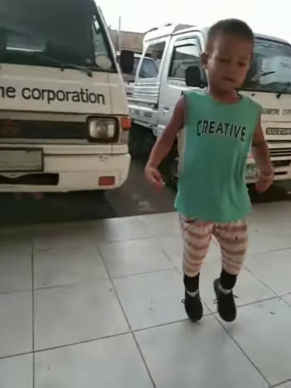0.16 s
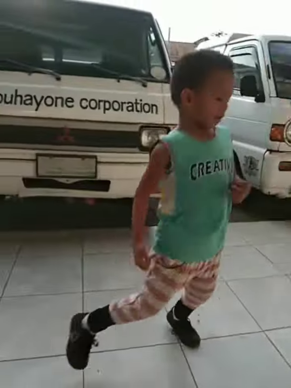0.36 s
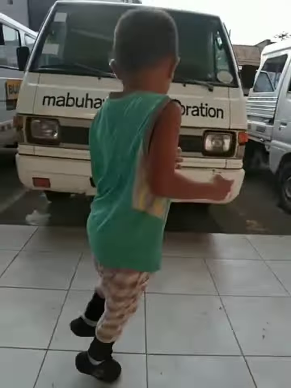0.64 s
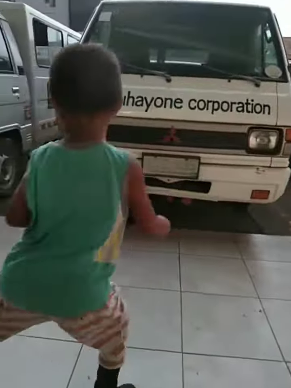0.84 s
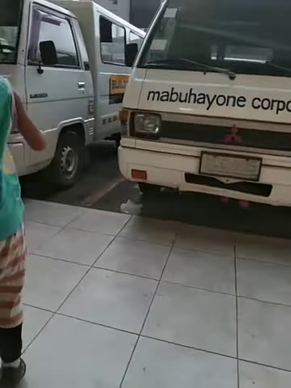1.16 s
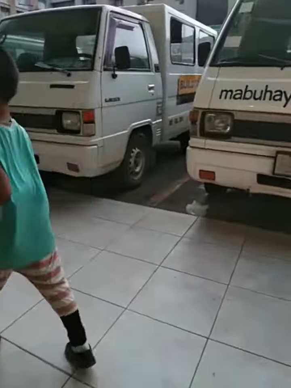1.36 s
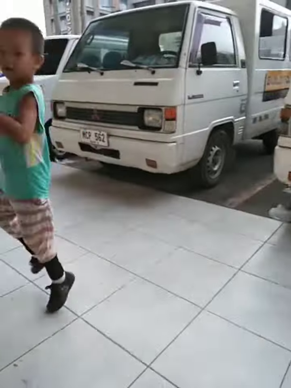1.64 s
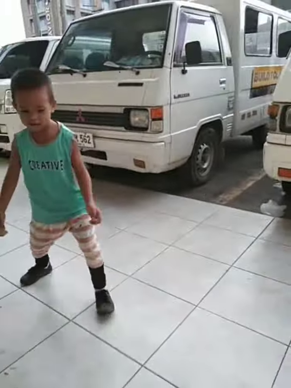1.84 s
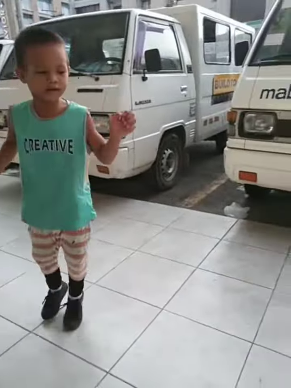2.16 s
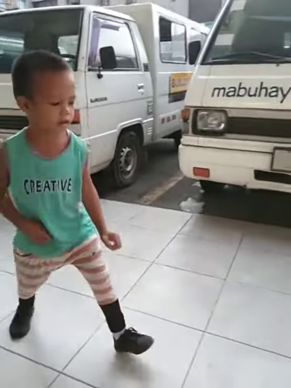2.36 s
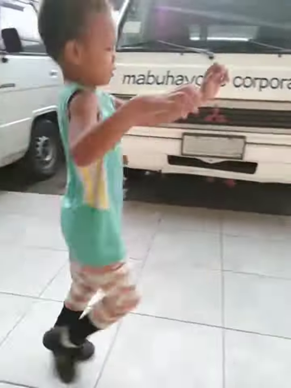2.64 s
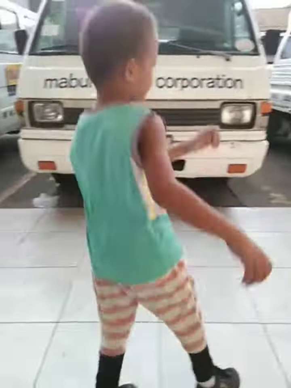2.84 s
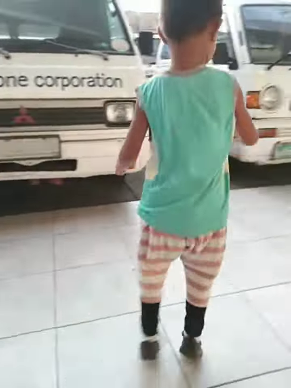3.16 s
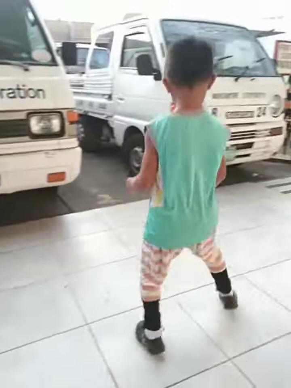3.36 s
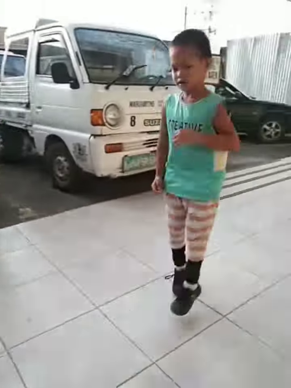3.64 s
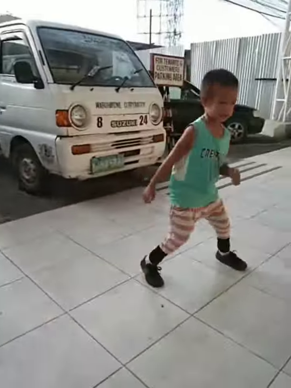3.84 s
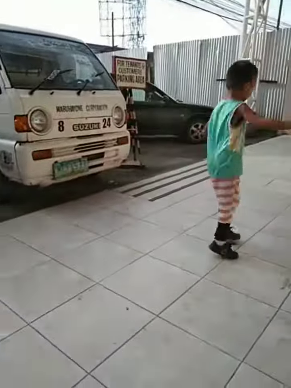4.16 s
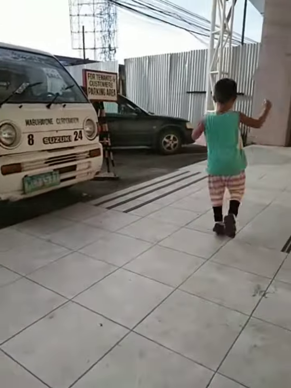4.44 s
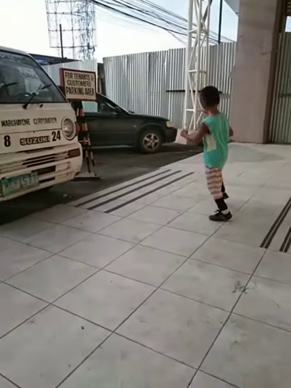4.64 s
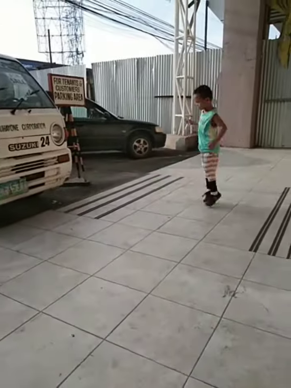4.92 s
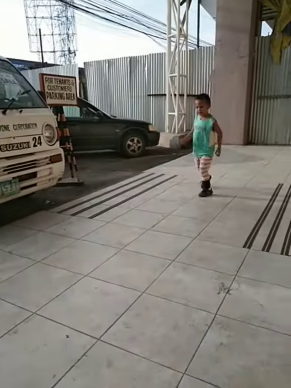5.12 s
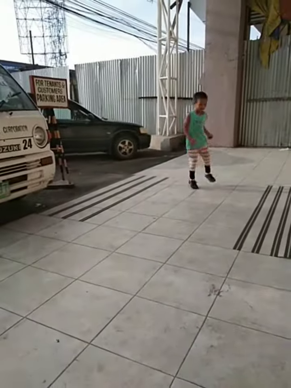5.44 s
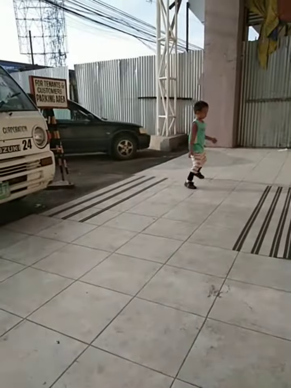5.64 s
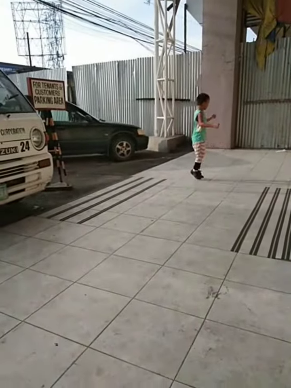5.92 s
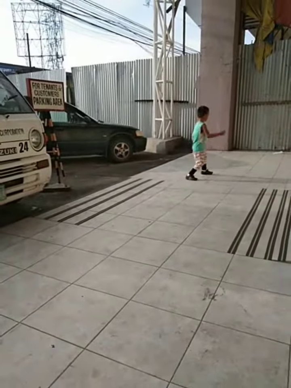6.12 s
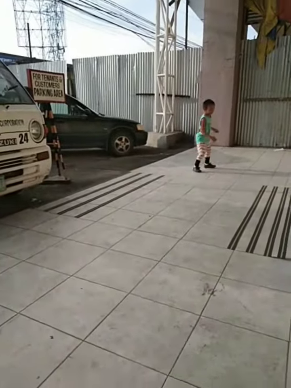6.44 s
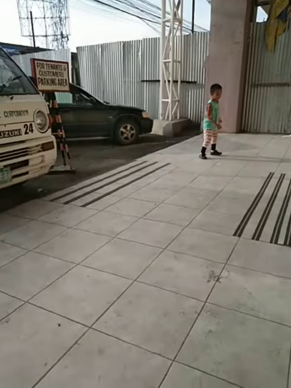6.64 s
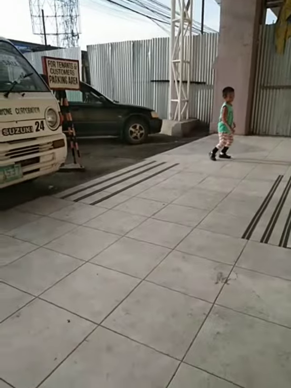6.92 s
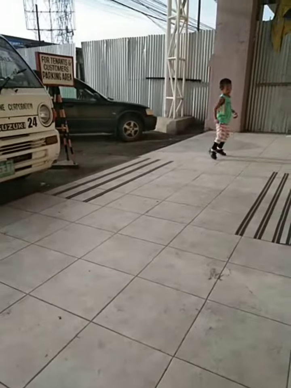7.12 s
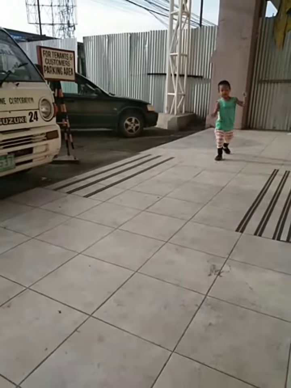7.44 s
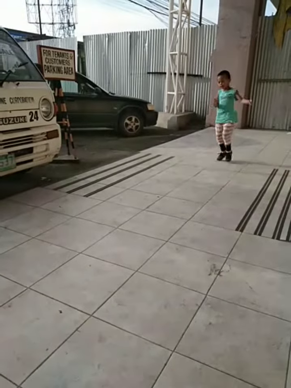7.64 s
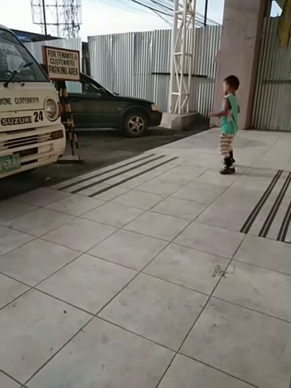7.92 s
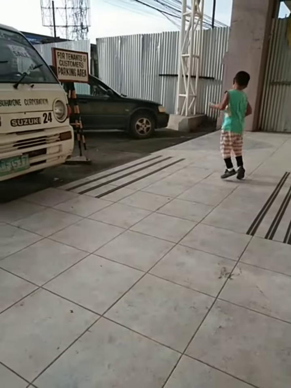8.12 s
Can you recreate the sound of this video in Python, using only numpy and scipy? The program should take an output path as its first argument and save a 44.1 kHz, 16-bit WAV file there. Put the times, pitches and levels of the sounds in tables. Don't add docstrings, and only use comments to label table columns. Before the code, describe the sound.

Gritty shoe scrapes and sharp sole taps on a tiled forecourt, a sparrow buzzing overhead, a distant brake whining and low traffic rumble behind.

```python
import sys
import numpy as np
from scipy import signal
from scipy.fft import rfft, irfft
from scipy.io import wavfile
from scipy.ndimage import uniform_filter1d, map_coordinates

SR = 44100
rng = np.random.default_rng(int(sys.argv[2]) if len(sys.argv) > 2 else 0)


def elevation(decibels):
    levels = np.asarray(decibels, float)
    return 10 ** (levels / 20)


def store_pcm(level_fs):
    pcm = np.round(np.clip(level_fs, -1, 1) * 32767).astype(np.int16)
    wavfile.write(sys.argv[1], SR, np.atleast_2d(pcm).T)


N = 364916
TIME = np.arange(N) / SR


def unit(x):
    return x / np.sqrt(np.mean(x ** 2) + 1e-20)


def along(points, hz):
    f, v = np.transpose(points)
    return np.interp(np.log(hz + 1), np.log(f + 1), v)


def wobble(rate):
    knots = rng.standard_normal(int(N * rate / SR) + 4)
    return map_coordinates(knots, [np.arange(N) * rate / SR])


def rush(spectrum, patchy_db, wide=4, long=12):
    hz, _, z = signal.stft(rng.standard_normal(N), SR, nperseg=512)
    field = uniform_filter1d(rng.standard_normal(z.shape), wide, 0)
    field = uniform_filter1d(field, long, 1)
    gain = elevation(patchy_db * unit(field) + along(spectrum, hz)[:, None])
    return unit(signal.istft(z * gain, nperseg=512)[1][:N])


def narrow(hz, width_hz, size):
    f = np.fft.rfftfreq(size, 1 / SR)
    resonance = np.exp(-.5 * ((f - hz) / width_hz) ** 2)
    return unit(irfft(rfft(rng.standard_normal(size)) * resonance, size))


def pulse(spectrum):
    f = np.fft.rfftfreq(2048, 1 / SR)
    cep = irfft(np.log(elevation(along(spectrum, f)) + 1e-6))
    cep[1:1024] *= 2
    cep[1025:] = 0
    click = irfft(np.exp(rfft(cep)))[:1024]
    return click / np.abs(click).max()


def add(track, s, x):
    part = track[round(s * SR):][:len(x)]
    part += x[:len(part)]


def blips(rows):
    out = np.zeros(N)
    for s, length, hz, db in rows:
        size = 2 * int(length * 1.2 * SR / 2)
        swell = np.sin(np.pi * np.linspace(0, 1, size) ** 0.75) ** 0.84
        add(out, s, elevation(db + 5.0) * narrow(hz, 30 + .008 * hz, size) * swell)
    return out


def stroke(s, db, rise, fade, hold=0, loss_db=0):
    t = np.arange(N * 1000 // SR + 2) / 1000 - s
    corners = [-5 * rise, 0, hold + 1e-4, hold + 5 * fade]
    return elevation(np.interp(t, corners, [db - 100, db, db - loss_db, db - loss_db - 100]))


def played(gains):
    total = sum(gains)
    return np.interp(TIME, np.arange(len(total)) / 1000, total)


# frequency in Hz, 60 dB decay in seconds.
CANOPY_DECAY = [(200, 0.25), (2000, 0.4), (5000, 0.46), (12000, 0.073)]


def echoed(x, echo_db, gap=0.015):
    hz, t, z = signal.stft(rng.standard_normal(SR // 2), SR, nperseg=256)
    decay = elevation(-60 * t / along(CANOPY_DECAY, hz)[:, None])
    build_up = np.clip(t / gap, 0, 1) ** 2
    tail = signal.istft(z * decay * build_up, SR, nperseg=256)[1]
    wet = elevation(echo_db) * signal.fftconvolve(x, tail / np.linalg.norm(tail))
    return wet + np.pad(x, (0, len(wet) - len(x)))


# time in seconds, rumble level in dB.
TRAFFIC_LEVEL = [(0, -61.5), (.8, -62.5), (1.2, -59.5), (2.6, -64), (2.9, -62), (4, -64.5), (4.8, -64),
                 (6.9, -62.5), (7.2, -60), (7.6, -59.5), (8.27, -52.5)]
# frequency in Hz, density in dB per Hz.
RUMBLE_COLOUR = [(15, -70.5), (25, 6), (107, 4.5), (267, -14), (303, -19), (339, -6), (436, -61),
                 (500, -69), (650, -57), (1100, -120)]
# frequency in Hz, density in dB per Hz.
HISS_COLOUR = [(180, 6.5), (300, -2), (546, -3.5), (2280, -9.5), (2790, -16), (3760, -8.5), (4670, -15),
               (8220, -16), (10400, -14.5), (11700, -33), (12300, -16), (15200, -21.5), (16000, -43)]


def traffic():
    rumble_db = np.interp(TIME, *np.transpose(TRAFFIC_LEVEL))
    engine = elevation(-8) * narrow(118.5, 9, N)
    rumble = rush(RUMBLE_COLOUR, patchy_db=1.5) + engine
    rumble = rumble * elevation(rumble_db - 1.5 + 0.48 * wobble(14))
    opening_db, settle_s = 8.5, .2
    hiss_db = -68 + opening_db * np.exp(-TIME / settle_s) + 1.1 * wobble(2.37)
    return rumble + elevation(hiss_db + 4.5) * rush(HISS_COLOUR, patchy_db=1.5, wide=3, long=16)


# start in seconds, length in seconds, pitch in Hz, level in dB.
INSECT_LINES = [
    (0.753, 0.84, 5894, -76.5),
    (2.3, 0.32, 5880, -75.5),
    (3.299, 1.5, 10920, -77),
    (3.295, 1.4, 10060, -84),
    (4.597, 1.27, 10410, -78.5),
    (0.498, 0.11, 7800, -76.5),
]


def insects():
    return blips(INSECT_LINES)


# peak in seconds, low tone in dB, its octave in dB,
# fade in seconds over 20 dB.
BRAKE_GRIPS = [(.04, -67.5, -59.5, 0.58), (.21, -52, -68, -0.95), (.27, -79, -76.5, 1.2),
               (.345, -52.5, -78, 0.44), (.54, -75, -59, 0.4), (.72, -65, -66, 0.23), (.92, -92, -70, .12),
               (1.1, -57, -51, -0.18), (1.21, -63, -63, 0.24), (1.29, -91, -55.5, -0.48),
               (1.36, -63, -66, .04), (1.48, -79, -54.5, 0.24), (1.72, -82, -54.5, 0.05),
               (2.01, -97, -52, 0.35), (3.44, -91.5, -60, 0.36)]


def brake():
    rise_over_fade = 0.35
    low = played(stroke(s, db, rise_over_fade * fade, fade) for s, db, _, fade in BRAKE_GRIPS)
    octave = played(stroke(s, db, rise_over_fade * fade, fade) for s, _, db, fade in BRAKE_GRIPS)
    waver_s, wavers_a_second = .0003, 14
    path = [np.arange(N) + waver_s * SR * wobble(wavers_a_second)]
    low_tone = map_coordinates(narrow(1196, 36.6, N), path, order=3)
    octave_tone = map_coordinates(narrow(2388, 72, N), path, order=3)
    low = low * elevation(2.6 * wobble(17.86)) * low_tone
    return low + octave * elevation(4.0 * wobble(20.99)) * octave_tone


def stray_squeaks():
    rows = []
    for s in rng.uniform(0, N / SR, size=40):
        a, b, c = rng.standard_normal(3)
        hz = np.clip(8000 * np.exp(b / 4), 5500, 12000)
        rows.append((s, .15 * np.exp(a / 2), hz, -81 + 2 * c))
    return blips(rows)


# start in seconds, peak in dB, bottom of the beak's band in Hz,
# buzz in Hz.
SPARROW_CALLS = [
    (0.651, -45, 3710, 570),
    (1.574, -45.5, 3400, 648),
    (1.789, -45, 3770, 522),
    (2.693, -35.5, 3780, 662),
    (3.59, -36.5, 3300, 607),
    (4.594, -41, 3140, 522),
    (5.31, -37.5, 3480, 684),
    (6.266, -36.5, 3110, 618),
    (7.676, -33, 3600, 453.4),
]


def sparrow():
    out = np.zeros(N)
    length, start_hz, fall_hz, beak_top_hz = .08, 5190, 1247.7, 5320
    t = np.arange(int(length * SR)) / SR
    for s, db, bottom_hz, buzz_hz in SPARROW_CALLS:
        pitch = start_hz - fall_hz * (t / length) ** 1.1
        swing = (1.09 + 0.83 * t / length) * np.sin(2 * np.pi * buzz_hz * t)
        swing = swing + .5 * np.sin(2 * np.pi * 170 * t)
        call = np.sin(2 * np.pi * np.cumsum(pitch) / SR + swing) * np.sin(np.pi * t / length) ** 0.21
        call = np.pad(call, (0, 200))
        delay_s = round(start_hz / buzz_hz) / start_hz
        call = call + .8 * np.roll(call, round(SR * delay_s))
        beak = signal.butter(8, [bottom_hz, beak_top_hz], "band", fs=SR, output="sos")
        call = signal.sosfilt(beak, echoed(call, echo_db=10.5, gap=0.0026))
        add(out, s - .01, elevation(db - 16.5) * call)
    return out


# start in seconds, length in seconds, level in dB.
STEEL_RINGS = [(1.618, 0.12, -65), (2.003, 0.37, -73), (2.711, 0.76, -65), (2.982, 0.081, -61.5),
               (3.079, 0.13, -62), (3.293, 0.48, -62.5), (4.211, 0.34, -61.5), (4.451, 0.38, -65.5),
               (5.117, 0.12, -67.5), (8.17, 0.089, -59)]


def steel():
    partials = [(0.98, 0), (1.19, -12), (1.28, -14)]  # ratio, dB
    return blips([(s, length, 8580 * ratio, db + up_db)
                  for s, length, db in STEEL_RINGS for ratio, up_db in partials])


# start in seconds, length in seconds, level in dB.
POST_RINGS = [(2.005, 0.042, -67.5), (4.37, 0.091, -69), (7.026, 0.16, -67), (7.326, 0.062, -69.5),
              (7.434, 0.092, -63), (7.587, 0.047, -74), (7.732, .08, -74.5), (7.899, 0.18, -71.5),
              (8.182, 0.044, -70)]


def post():
    return blips([(s, length, 1588, db) for s, length, db in POST_RINGS])


# start in seconds, length in seconds, pitch in Hz, level in dB.
BUMPS = [(0.032, 0.069, 813, -62), (2.197, 0.045, 76, -59.5), (2.545, 0.036, 797, -68.5),
         (2.701, .053, 550, -60), (2.789, 0.031, 277, -51), (3.162, 0.016, 266, -50.5),
         (3.285, 0.035, 89, -54.5), (4.138, 0.13, 630, -62), (4.202, 0.015, 618, -53.5),
         (4.348, 0.02, 513, -63), (5.451, 0.027, 96, -55), (5.867, 0.042, 640, -67.5),
         (6.48, 0.065, 644, -63.5), (6.696, 0.0077, 567, -49), (6.988, .008, 470, -42),
         (7.1, 0.13, 830, -73), (7.21, 0.093, 756, -68), (7.361, 0.015, 1007, -63.5),
         (7.498, 0.019, 646, -63), (7.564, 0.14, 856, -62), (7.678, .046, 259, -53.5),
         (7.738, 0.028, 1940, -65), (7.79, 0.021, 703, -67.5), (7.829, 0.028, 105, -53),
         (7.871, .049, 119, -46.5), (7.963, 0.024, 570, -59), (8.131, 0.17, 121, -58.5),
         (8.198, 0.11, 835, -66.5)]


def knocks():
    return blips(BUMPS)


# frequency in Hz, density in dB per Hz.
CLOTH_COLOUR = [(350, -120), (500, 0.5), (750, 6.5), (1600, -7), (2600, -29.5), (3200, -120)]


def rustle():
    fade_in = np.clip((TIME - 7.05) / .08, 0, 1)
    return elevation(-66.5) * fade_in * rush(CLOTH_COLOUR, patchy_db=7.0, wide=2, long=8)


# start in seconds, length in seconds, pitch in Hz, level in dB.
RUBBER_SQUEAKS = [(0, 0.027, 7700, -62.5), (0, 0.085, 3340, -64.5), (.62, .08, 2650, -64),
                  (.627, 0.14, 5720, -67.5), (1, 0.11, 4090, -62.5), (1.665, 0.085, 7470, -61.5),
                  (1.748, 0.19, 5730, -65.5), (1.916, 0.21, 7000, -63), (2.01, .27, 5800, -68),
                  (2.281, 0.071, 9460, -68), (2.959, 0.069, 4100, -65.5), (3.427, .32, 7300, -68),
                  (3.965, 0.095, 3320, -68.5), (4.075, 0.1, 2430, -69.5), (4.247, .1, 6000, -69),
                  (4.917, .12, 5950, -67.5), (5.276, 0.076, 6490, -68.5), (5.759, 0.19, 6580, -71),
                  (5.764, .3, 5720, -69), (5.82, 0.12, 9160, -67.5), (6.192, 0.2, 2470, -64.5),
                  (7.038, .1, 6560, -68), (7.151, 0.53, 6480, -67), (7.215, 0.099, 8770, -61.5),
                  (7.218, 0.11, 7700, -64), (7.29, 0.3, 4140, -67.5), (7.321, 0.17, 2530, -67),
                  (7.837, 0.12, 6770, -65.5), (7.96, .15, 3970, -68), (8.103, 0.11, 6450, -66)]


def squeaks():
    return blips(RUBBER_SQUEAKS)


# start in seconds, peak in dB, canopy echo in dB, low mode in dB, high mode in dB.
TILE_CLACKS = [
    (0.274, -34, -21, -19, -7),
    (0.5096, -37.5, -10.5, -8, 7),
    (1.3452, -49.5, -18, 13, 8),
    (3.043, -27.5, -11, -16.5, 4.5),
    (4.3494, -30, -7, -5, -1.5),
]
# frequency in Hz, 60 dB decay in seconds.
TILE_MODES = [(1300, 0.048), (1850, 0.024), (2000, 0.024), (2430, 0.026), (3250, 0.05), (4150, 0.052),
              (5850, 0.038)]


def loose_tile():
    out, t = np.zeros(N), np.arange(SR // 10) / SR
    for s, db, echo_db, low_db, high_db in TILE_CLACKS:
        tilt = [(1300, low_db), (1900, 0.0049), (2400, high_db), (3300, high_db - 22.0), (6000, high_db - 17)]
        ring = np.zeros(len(t))
        for hz, t60 in TILE_MODES:
            mode_db = along(tilt, hz) + rng.normal(0, 2) - 60 * t / t60
            ring += elevation(mode_db) * np.sin(2 * np.pi * hz * t)
        ring *= (1 - np.exp(-t / 0.0013)) ** 2
        add(out, s, elevation(db - 5) * echoed(ring, echo_db))
    return out


# time in seconds, peak in dB, canopy echo in dB.
SOLE_SNAPS = [
    (2.7982, -7, -15),
    (3.1674, -6.5, -14),
    (6.698, -29.5, -31),
]
# frequency in Hz, density in dB per Hz.
SNAP_COLOUR = [(120, -28.5), (290, 4), (410, -12.5), (600, 2.5), (1310, 3.5), (1820, -2.5), (2650, 0),
               (3160, -3.5), (4080, 7), (5070, -13), (5700, -2), (8450, 7.5), (16500, -26)]
# time in seconds, peak in dB, canopy echo in dB.
HEEL_STAMPS = [
    (7.0095, -13.5, -11),
]
# frequency in Hz, density in dB per Hz.
STAMP_COLOUR = [(88, -39.5), (230, -1), (560, 2), (1690, -12), (2700, -26.5), (4080, -16), (4510, -23.5),
                (5170, -47), (7810, -22), (13600, -40), (16500, -95)]


def taps():
    out = np.zeros(N)
    for events, colour in ((SOLE_SNAPS, SNAP_COLOUR), (HEEL_STAMPS, STAMP_COLOUR)):
        for s, db, echo_db in events:
            add(out, s + 0.00089, elevation(db + 0.5) * echoed(pulse(colour), echo_db))
    return out


# peak in seconds, scrape in dB, weight on the sole in dB, rise and fade in
# seconds over 20 dB.
SOLE_SCUFFS = [(0.069, -58.5, -0.5, 0.042, 0.072), (.21, -72.5, 18, 0.04, 0.14),
               (.55, -57, -4, 0.037, 0.1), (.66, -62, 12, 0.076, 0.15), (.83, -67, 6.5, 0.072, 0.15),
               (1.358, -57, 0, 0.017, 0.058), (1.499, -60.5, 12, 0.09, 0.22),
               (1.732, -60.5, 9, .12, 0.021), (2.3, -63.5, -3, 0.011, 0.11), (2.53, -66, 10, .09, 0.096),
               (2.809, -63.5, 13, 0.1, 0.016), (2.899, -50.5, 11, 0.057, 0.078),
               (3.09, -65, 10, 0.83, .13), (3.2, -65.5, -1, 0.027, 1),
               (3.62, -54.5, -1, 0.11, 0.11), (3.908, -56.5, -2, 0.034, 0.27),
                  (4.238, -71, -1, 0.027, 0.22), (4.35, -62, -22, 0.072, 0.17),
                  (4.53, -59.5, -0.5, .01, 0.066), (5.16, -77, -16.5, 0.247, 0.59),
                  (5.38, -71.5, 7.5, 0.43, 0.051), (5.55, -67, -13.5, 0.23, 0.17),
                  (5.85, -60, 5.5, 0.075, .25), (6.7, -60, 6, 0.042, 0.062),
                  (6.82, -69.5, -3.5, 0.017, 0.022), (6.89, -62.5, 5.5, 0.068, .015),
                  (7.02, -58.5, -4, 0.071, 0.19), (7.36, -54.5, 6.5, 0.19, 0.28),
                  (8.22, -52, 3, 0.036, 0.13)]
# start in seconds, length in seconds, scrape in dB, weight in dB,
# loss over the slide in dB.
SOLE_SLIDES = [
    (1.006, 0.053, -52, 5, 0),
    (1.956, 0.28, -58.5, 13, 10.5),
    (4.597, 0.38, -74.5, -16, -1.5),
    (6.241, 0.36, -47.5, 2, 5.5),
    (7.674, 0.43, -62.5, 6, 1),
]
# frequency in Hz, density in dB per Hz.
GRIT_COLOUR = [(2350, -67), (4000, -27), (4520, -94.5), (5380, -62), (5830, 7.5), (8400, 15.5),
               (14200, -5.5), (15500, -7.5), (16000, -30)]
# frequency in Hz, density in dB per Hz.
LOADED_COLOUR = [(1500, -120), (2200, -1), (3200, -4.5), (4200, -2.5), (6000, 7.5), (7500, -29),
                 (9500, -120)]


def scuffs():
    rows = [(*scuff, 0, 0) for scuff in SOLE_SCUFFS]
    slide_rise_s, slide_fade_s = 0.048, 0.13
    for s, hold, db, weight_db, loss_db in SOLE_SLIDES:
        rows.append((s, db, weight_db, slide_rise_s, slide_fade_s, hold, loss_db))
    lag_s = 0.005
    touch = played(stroke(s, db, *shape) for s, db, _, *shape in rows)
    load = played(stroke(s + lag_s, db + weight_db, *shape) for s, db, weight_db, *shape in rows)
    grain = elevation(.9 * wobble(120) + .9 * wobble(600))
    light = elevation(4) * rush(GRIT_COLOUR, patchy_db=.8)
    loaded = elevation(-9.5) * rush(LOADED_COLOUR, patchy_db=4.0)
    return grain * (touch * light + load * loaded)


def scene():
    flutter = elevation(2.5 * wobble(40))
    weak = insects() + brake() + stray_squeaks() + steel() + post() + squeaks()
    mono = traffic() + weak * flutter + sparrow() + knocks() + rustle()
    mono = mono + loose_tile() + taps() + scuffs()
    return np.array([mono, mono])


def suppress(x, depth_db=13, soft_db=2):
    hz, _, z = signal.stft(x[0], SR, nperseg=384)
    power = uniform_filter1d(np.abs(z) ** 2, 7, -1)
    level = 10 * np.log10(np.abs(power) + 1e-18)
    quick = unit(uniform_filter1d(rng.standard_normal(z.shape), 20, 1))
    slow = unit(uniform_filter1d(rng.standard_normal(z.shape), 130, 1))
    floor = np.percentile(level, 40, axis=-1, keepdims=True)
    guess = floor + np.minimum(10 + 6 * quick + 9 * slow, 21)
    reach = np.clip(np.log2(hz + 1)[:, None] / 2.5 - 4.2, .15, 1.3)
    shut = .5 * (1 - np.tanh((level - guess) / soft_db))
    return signal.istft(z * elevation(-depth_db * reach * shut), nperseg=384)[1][:N] * np.ones((2, 1))


def top_cut(x):
    return signal.sosfilt(signal.butter(12, 16820, fs=SR, output="sos"), x)


def record(dry):
    bass_cut = signal.butter(4, 55, "high", fs=SR, output="sos")
    heard = suppress(signal.sosfilt(bass_cut, dry))
    dip_s, dip_length_s, dip_db = 1.748, .012, -22
    t = TIME - dip_s
    dip = elevation(dip_db * (t > 0) * np.exp(-np.abs(t) / dip_length_s))
    return top_cut(heard * dip)


dry = scene()
out = record(dry)
store_pcm(out)
```